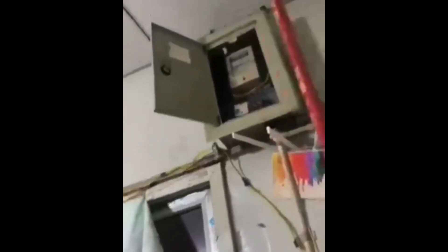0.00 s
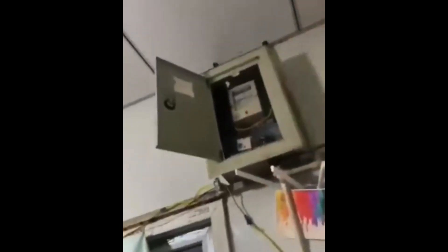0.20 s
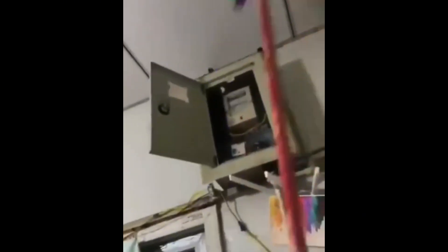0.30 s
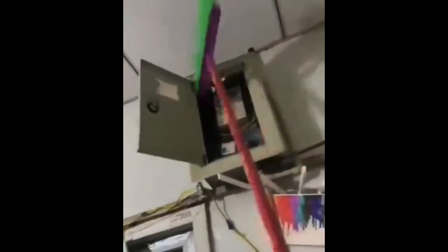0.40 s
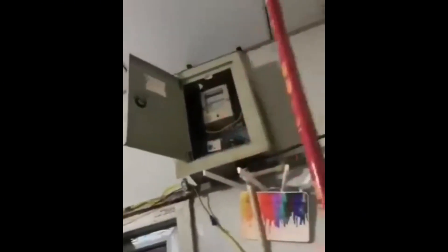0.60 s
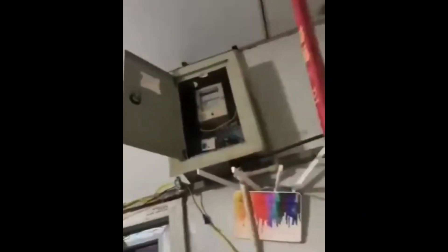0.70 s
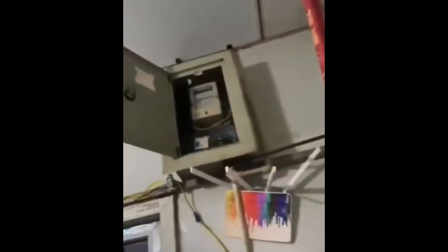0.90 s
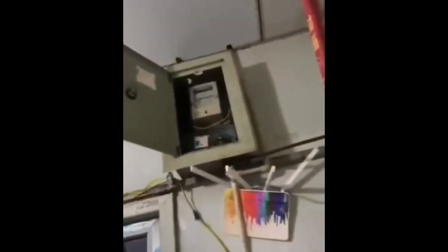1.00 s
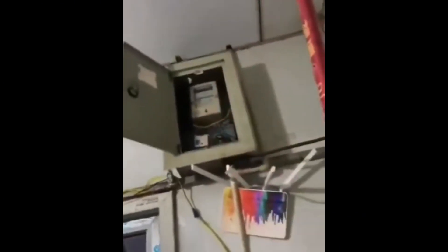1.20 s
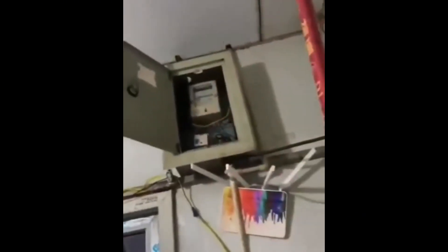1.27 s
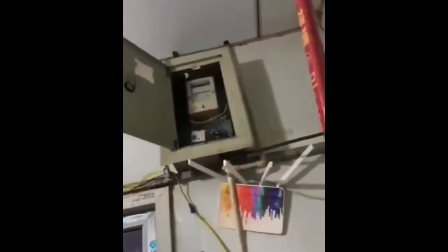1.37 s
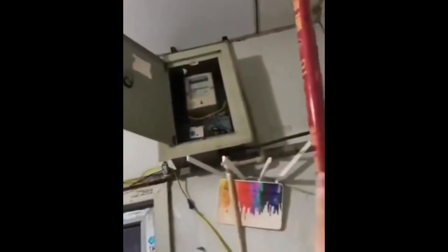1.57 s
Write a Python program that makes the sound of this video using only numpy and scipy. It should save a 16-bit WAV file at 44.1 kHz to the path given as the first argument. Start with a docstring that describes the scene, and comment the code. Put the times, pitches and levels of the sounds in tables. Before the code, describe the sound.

A sheet-metal cabinet door bangs hard once, rattles and booms, then knocks dully on its stop.

```python
"""Pole knocks a steel cabinet door

Low rumble, hiss and a faint hum, with soft scuffs of the pole: shaped noise and one wandering tone.
The sheet-steel door crashes against its frame: noise bursts, decaying modes and a diffuse room ring.
It rebounds: the latch chatters in bright noise ticks and the loose panel booms in slow modes.
The door then meets its stop with a duller knock of noise and modes, and touches it again."""
import sys
import numpy as np
from scipy import signal
from scipy.fft import rfft, irfft, next_fast_len
from scipy.io import wavfile
from scipy.ndimage import map_coordinates

SR = 44100
rng = np.random.default_rng(int(sys.argv[2]) if len(sys.argv) > 2 else 0)


def master_out(mix):
    """Clip the mix to full scale and print it as 16-bit PCM to the path in sys.argv[1]."""
    frames = np.transpose(np.atleast_2d(mix))
    ceiling = np.clip(frames, -1, 1)
    pcm = np.round(ceiling * 32767).astype(np.int16)
    wavfile.write(sys.argv[1], SR, pcm)


N = 70560


def amp(db):
    """Decibels to gain."""
    return 10 ** (np.asarray(db) / 20)


def unit(x):
    """Scale to rms 1."""
    return x / np.sqrt(np.mean(x ** 2) + 1e-20)


def along(points, hz):
    """Interpolate (Hz, value) points on a log frequency axis."""
    f, v = np.transpose(points)
    return np.interp(np.log(hz + 1), np.log(f + 1), v)


def curves(rows):
    """One value per sample for each column after the time."""
    s, *cols = np.transpose(rows)
    return [np.interp(np.arange(N) / SR, s, c) for c in cols]


def since(s):
    """Seconds since s, zero before it."""
    return np.maximum(np.arange(N) / SR - s, 0)


def filtered(x, response):
    """Multiply the spectrum of x by a response of frequency."""
    size = next_fast_len(N + SR // 2)
    hz = np.fft.rfftfreq(size, 1 / SR)
    return irfft(rfft(x, size) * response(hz), size)[..., :N]


# stereo width: (frequency [Hz], side over mid [dB])
WIDTH = [(2000, -82), (3300, -79.5), (5000, -19), (9000, -6)]
RIPPLE_HZ = 54.94  # spacing of the crowded resonances of steel and walls


def noise(colour, ripple_db):
    """Coloured stereo noise of rms 1 with random narrow peaks and valleys, wide only in the treble."""
    knots = rng.standard_normal(1024)

    def gain(hz):
        bumps = map_coordinates(knots, [hz / RIPPLE_HZ], mode="mirror")
        mid_gain = amp(along(colour, hz) + abs(ripple_db) * np.tanh(bumps))
        return mid_gain * np.array([np.ones_like(hz), amp(along(WIDTH, hz))])

    mid, side = filtered(rng.standard_normal((2, N)), gain)
    return unit(np.array([mid + side, mid - side]))


def blows(contacts, attack_s, t60_s):
    """Power-summed envelope of contacts that each rise and die away."""
    power = np.zeros(N)
    for s, db in contacts:
        t = since(s)
        power += (amp(db - 60 * t / t60_s) * (1 - np.exp(-t / attack_s))) ** 2
    return np.sqrt(power)


def ring(s, modes, attack_s, rough_rad):
    """Decaying modes struck at s, levels scattered by 1 dB, phases wandering as the sheet bends."""
    t, out = since(s), np.zeros(N)
    for hz, db, t60_s in modes:
        drift = map_coordinates(rng.standard_normal(128), [t * 25], order=3, mode="mirror")
        gain = amp(db + rng.normal(0, 1) - 60 * t / t60_s)
        out += gain * np.sin(2 * np.pi * hz * t + rough_rad * drift)
    return out * (1 - np.exp(-t / attack_s))


def strongest(contacts):
    """Time and level of the hardest contact."""
    return max(contacts, key=lambda row: row[1])


# background levels: (time [s], rumble level [dB], hiss level [dB])
FLOOR_LEVELS = [(0, -49, -52), (.13, -47, -54.5), (.5, -35.5, -65.5), (.75, -39.5, -56.5),
                (.92, -40.5, -51.5), (1.05, -48, -60), (1.25, -50, -62), (1.45, -51, -59.5),
                (1.6, -54.5, -58)]
# rumble spectrum: (frequency [Hz], level [dB])
RUMBLE_COLOUR = [(15, -53.5), (25, -10.5), (53, -1), (81, 1), (141, -7.5), (167, -10.5), (246, -10.5),
                 (274, -15.5), (403, -21), (600, -35), (780, -49), (1320, -120)]
# hiss spectrum: (frequency [Hz], level [dB])
HISS_COLOUR = [(240, -36), (400, -1.5), (576, -8.5), (1130, -6), (1310, -14), (2120, -10), (2260, -10),
               (2820, -10.5), (3620, -16.5), (9000, -32), (11700, -67), (19800, -120)]
HUM_HZ, HUM_DB = 239, -56


def background():
    """Low rumble and room hiss as shaped noise, plus a faint hum of wandering phase."""
    rumble_db, hiss_db = curves(FLOOR_LEVELS)
    rumble = amp(rumble_db) * noise(RUMBLE_COLOUR, ripple_db=2)
    hiss = amp(hiss_db) * noise(HISS_COLOUR, ripple_db=4.5)
    hum = amp(HUM_DB) * ring(0, [(HUM_HZ, 0, np.inf)], attack_s=.01, rough_rad=.35)
    return rumble + hiss + hum


# flexes of the loose panel: (time [s], level [dB], favoured pitch [Hz])
FLEXES = [(0, -38.5, 135), (0.204, -25.5, 109), (.271, -20, 75.3), (.325, -25.5, 95), (.386, -19, 130),
          (0.562, -32.5, 59.3), (1.075, -41.5, 73)]
# slow panel modes: (frequency [Hz], level [dB], t60 [s])
PANEL_MODES = [(38.8, -15.5, 0.94), (53.3, -4.5, 1), (83.3, -0.5, .5), (104.1, -2.5, 0.37),
               (134.1, 2, 0.26), (186, -1, 0.4)]
FLEX_OCTAVES = 0.68  # distance from the favoured pitch that costs 10 dB


def wobble():
    """The loose panel flexes back and forth; each flex booms in the modes near its own pitch."""
    out = np.zeros(N)
    for s, db, pitch_hz in FLEXES:
        modes = []
        for hz, level_db, t60_s in PANEL_MODES:
            octaves = np.log2(hz / pitch_hz)
            modes.append((hz, level_db - 10 * (octaves / FLEX_OCTAVES) ** 2, t60_s))
        out += amp(db) * ring(s, modes, attack_s=0.00068, rough_rad=0.7)
    return out


# soft rubs: (time [s], length [s], level [dB])
SCUFFS = [(0.005, 0.049, -55), (0.053, 0.025, -44), (.705, 0.066, -51.5), (1.06, 0.035, -63)]
# scuff spectrum: (frequency [Hz], level [dB])
SCUFF_COLOUR = [(100, -17), (400, -0.5), (780, 2.5), (1050, -3.5), (1600, -35), (5000, -34), (9000, -30.5)]


def scuffs():
    """Light rubs: shaped noise that swells and fades in Gaussian bumps."""
    t = np.arange(N) / SR
    envelope = sum(amp(db) * np.exp(-2 * ((t - s) / length_s) ** 2) for s, length_s, db in SCUFFS)
    return noise(SCUFF_COLOUR, ripple_db=3) * envelope


# room decay: (frequency [Hz], t60 [s])
ROOM_T60 = [(100, 0.81), (400, 0.68), (1000, 0.83), (2500, .75), (5000, 0.74), (9000, 0.63)]
ROOM_BUILD_S = 0.021


def room_tail(contacts, colour):
    """Diffuse ring of steel and walls; each frequency dies at its own speed."""
    hz, t, z = signal.stft(noise(colour, ripple_db=5), SR, nperseg=256)
    age_s = np.maximum(t - contacts[0][0], 0)
    decay = amp(-60 * age_s / along(ROOM_T60, hz)[:, None])
    tail = signal.istft(z * decay, SR, nperseg=256)[1][:, :N]
    return tail * blows(contacts, ROOM_BUILD_S, np.inf)


# spectrum of the crash's room tail and sheet partials: (frequency [Hz], level [dB])
TAIL_COLOUR = [(120, -13), (200, -3.5), (349, -1), (397, -7), (436, -9.5), (762, -15.5), (1510, -14),
               (3990, -16.5), (7800, -27), (8580, -40.5), (9000, -64), (11700, -95), (19800, -120)]
SHEET_LOW_HZ, SHEET_HIGH_HZ, SHEET_T60_S, SHEET_SCATTER_DB = 899, 8356, 0.46, 4
CRASH_ATTACK_S = 0.0025


def sheet(s):
    """Crowded upper modes: thin partials of unequal strength and life, rms 1 before decay and attack."""
    t = since(s)
    place, size, life, phase = rng.random((4, 140))
    hz = SHEET_LOW_HZ + (SHEET_HIGH_HZ - SHEET_LOW_HZ) * place
    gain = amp(along(TAIL_COLOUR, hz) + SHEET_SCATTER_DB * (2 * size - 1))
    gain = gain / np.sqrt(np.sum(gain ** 2) / 2)
    t60_s = SHEET_T60_S * 2 ** (life - .5)
    out = np.zeros(N)
    for f, g, d, p in zip(hz, gain, t60_s, phase):
        out += g * np.exp(-np.log(1000) * t / d) * np.sin(2 * np.pi * (f * t + p))
    return out * (1 - np.exp(-t / CRASH_ATTACK_S))


# door against frame: (time [s], level [dB])
CRASH = [(.194, -27), (.1995, -21.5), (.206, -23), (.212, -17.5), (.219, -17.5), (.229, -20), (.240, -17.5)]
# clatter spectrum: (frequency [Hz], level [dB])
CRASH_COLOUR = [(60, -14.5), (130, -7.5), (300, -7.5), (560, -5), (750, -9.5), (1200, -8.5), (1550, -16),
                (2600, -13.5), (3600, -15.5), (5200, -20.5), (9000, -28.5)]
# door modes: (frequency [Hz], level [dB], t60 [s])
DOOR_MODES = [(242.2, -5, 0.97), (266, -4, 0.69), (309, 3.5, 0.51), (396.4, -1, 0.85), (470.6, 2.5, 0.69),
              (606.4, -2.5, 0.47), (1120, -8.5, 0.73), (1317, 1, 0.62), (1512, -4, 0.6), (1707, -3.5, 0.8),
              (2497, 2, 0.64), (2670, -13, 0.41), (3057, -6.5, 0.83), (3270, -11, 0.74), (3780, -2, 0.55)]
# hollow, short modes of the cabinet box: (frequency [Hz], level [dB], t60 [s])
BOX_MODES = [(183.9, -2, 0.26), (407.3, -1, 0.39), (482, -2, 0.24), (675, -2, 0.054), (736, -1.5, 0.092),
             (1036, -3, 0.14)]
# the pole slipping and squeaking just before the hardest contacts: (time [s], level [dB])
SQUEAK = [(.2005, -23), (.2065, -17.5)]
# squeak spectrum: (frequency [Hz], level [dB])
SQUEAK_COLOUR = [(1500, -47), (2200, -10.5), (2600, 9.5), (3000, -20), (4000, -43)]
# hard edge-on cracks: (time [s], level [dB])
CRACKS = [(.2122, -19), (.2198, -18.5), (.2305, -24), (.241, -27)]
# crack spectrum: (frequency [Hz], level [dB])
CRACK_COLOUR = [(300, -7), (2000, 0.5), (4600, 3), (6000, -23), (9000, -16.5)]
CRASH_T60_S, SQUEAK_T60_S, CRACK_T60_S = 0.18, 0.077, 0.012
TAIL_DB, RING_DB, SHEET_DB, BOX_DB = -7, -15.5, 2, -17


def crash():
    """Contacts clatter, squeak and crack as noise; box, door, sheet modes and the room ring on."""
    s, db = strongest(CRASH)
    squeak = noise(SQUEAK_COLOUR, ripple_db=3.5) * blows(SQUEAK, 0.0007, SQUEAK_T60_S)
    crack = noise(CRACK_COLOUR, ripple_db=7.5) * blows(CRACKS, 0.00011, CRACK_T60_S)
    clatter = noise(CRASH_COLOUR, ripple_db=1.5) * blows(CRASH, CRASH_ATTACK_S, CRASH_T60_S)
    box = amp(BOX_DB) * ring(s, BOX_MODES, attack_s=0.00087, rough_rad=0.71)
    door = ring(s, DOOR_MODES, attack_s=0.003, rough_rad=0.62)
    tones = amp(db + RING_DB) * (door + amp(SHEET_DB) * sheet(s))
    tail = amp(TAIL_DB) * room_tail(CRASH, TAIL_COLOUR)
    return squeak + crack + clatter + box + tones + tail


# latch ticks on the rebound: (time [s], level [dB])
CHATTER = [(.277, -39), (.327, -31.5), (.350, -26), (.360, -30), (.408, -33.5)]
# tick spectrum: (frequency [Hz], level [dB])
CHATTER_COLOUR = [(300, -18.5), (1500, 0), (2600, 0), (4200, 1.5), (7000, -5.5), (9000, -40)]
CHATTER_T60_S = 0.074


def chatter():
    """The loose latch chatters as the door rebounds: short bright noise ticks."""
    return noise(CHATTER_COLOUR, ripple_db=8.5) * blows(CHATTER, .0004, CHATTER_T60_S)


# door meeting its stop: (time [s], level [dB])
KNOCKS = [(.8095, -36), (.8125, -29), (.820, -30), (.827, -51), (.879, -39.5)]
# knock spectrum: (frequency [Hz], level [dB])
KNOCK_COLOUR = [(150, 0), (350, -11), (480, -1.5), (800, -9), (1400, -8), (1950, -15), (2600, -20.5),
                (3300, -33), (5000, -40), (8600, -50.5)]
# hinge-side modes: (frequency [Hz], level [dB], t60 [s])
STOP_MODES = [(486, 6, 0.2), (717, 8.5, 0.23), (846, 8, 0.24), (1024, 4, 0.33), (1494, -5, 0.43),
              (1950, -8, 0.43)]
KNOCK_T60_S, KNOCK_TAIL_DB, KNOCK_RING_DB, KNOCK_LOW_HZ = 0.17, -23.5, -13, 372
RETOUCH_S, RETOUCH_GAIN_DB = .895, -41.5


def knock():
    """Dull, hollow knock on the stop: high-passed noise and modes, then a soft touch of the lowest mode."""
    s, db = KNOCKS[0][0], strongest(KNOCKS)[1]
    thud = noise(KNOCK_COLOUR, ripple_db=1.5) * blows(KNOCKS, .0004, KNOCK_T60_S)
    tail = amp(KNOCK_TAIL_DB) * room_tail(KNOCKS, KNOCK_COLOUR)
    highpass = signal.butter(2, KNOCK_LOW_HZ, "high", fs=SR, output="sos")
    body = signal.sosfilt(highpass, thud + tail)
    retouch = amp(RETOUCH_GAIN_DB) * ring(RETOUCH_S, STOP_MODES[:1], attack_s=0.0065, rough_rad=.3)
    tones = amp(db + KNOCK_RING_DB) * ring(s, STOP_MODES, attack_s=0.0017, rough_rad=0.29)
    return body + retouch + tones


# crash gain, a brief dip then a lift: (time [s], level [dB])
DIP = [(.225, 0), (.252, -5.5), (.258, -11.5), (.268, -13), (.277, -2), (.30, -1), (.352, 5.5), (.43, 6.5),
       (.6, 1)]


def scene():
    """Sum of all sources; the crash dips briefly in level, then swells."""
    dip_db, = curves(DIP)
    return background() + wobble() + scuffs() + amp(dip_db) * crash() + chatter() + knock()


# microphone response: (frequency [Hz], level [dB])
MIC = [(20, 1.5), (8400, 2), (8900, -5.5), (9400, -6.5), (10500, -27.5), (11100, -32)]
CLIP_LEVEL, TOP_HZ = 0.79, 11160


def record(dry):
    """Dull microphone that rounds the highest peaks, with a steep band limit."""
    rounded = dry / (1 + (dry / CLIP_LEVEL) ** 8) ** (1 / 8)
    return filtered(rounded, lambda hz: amp(along(MIC, hz)) * (hz < TOP_HZ))


dry = scene()
out = record(dry)
master_out(out)
```